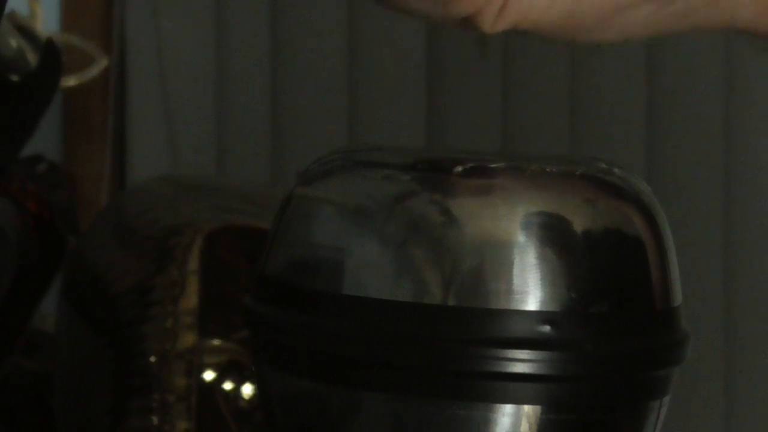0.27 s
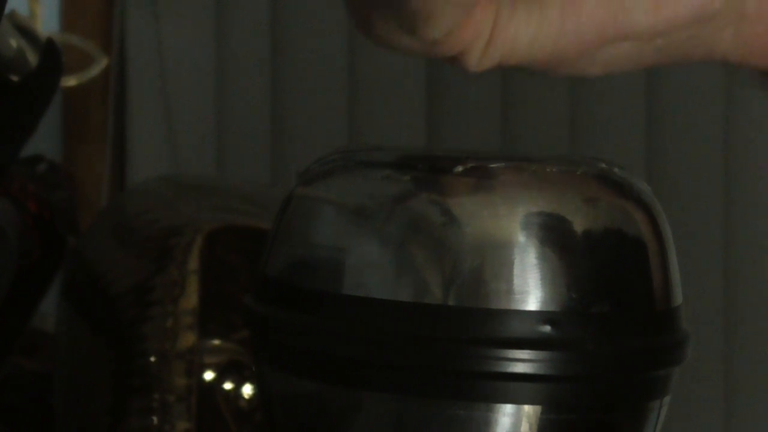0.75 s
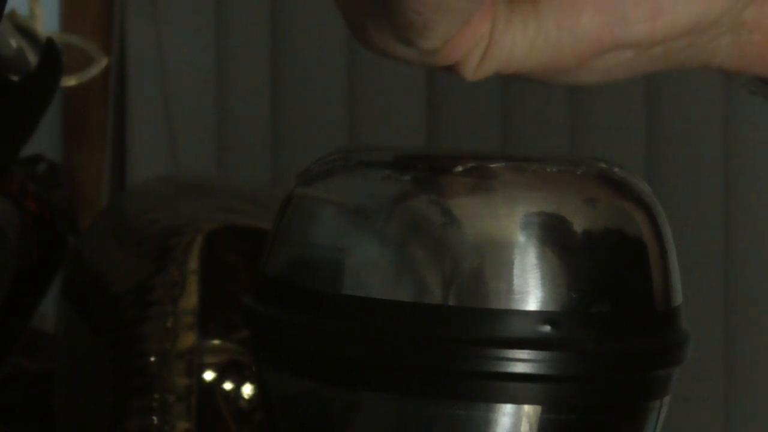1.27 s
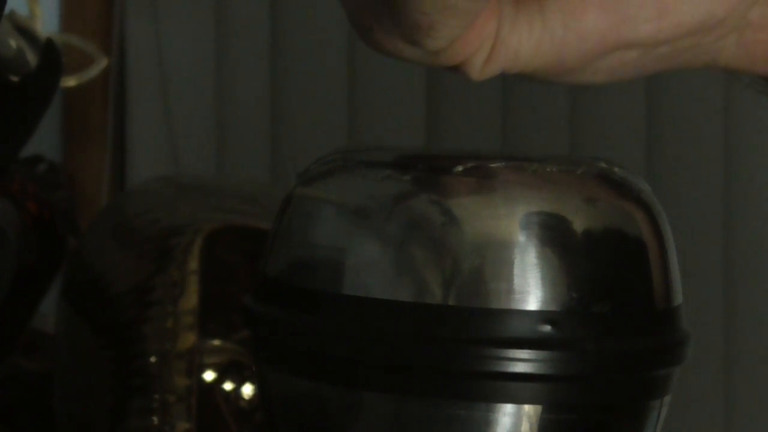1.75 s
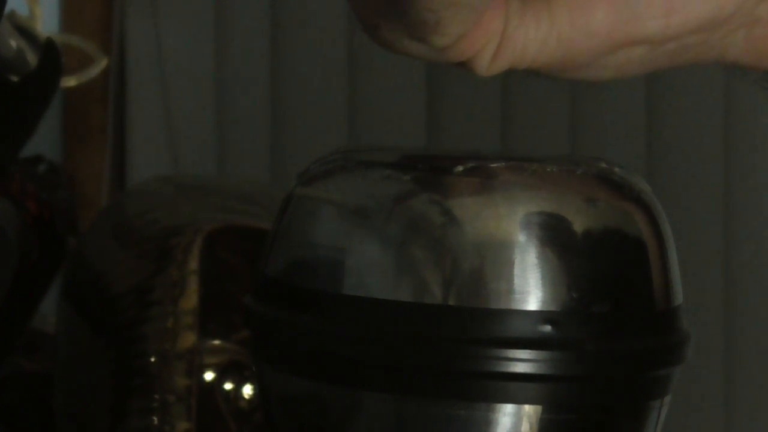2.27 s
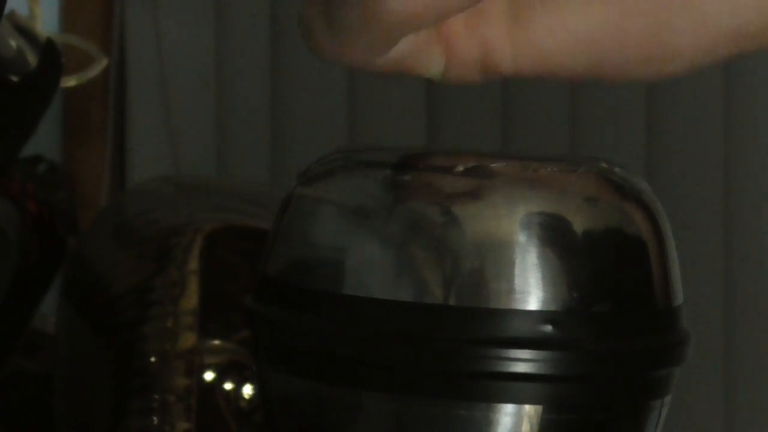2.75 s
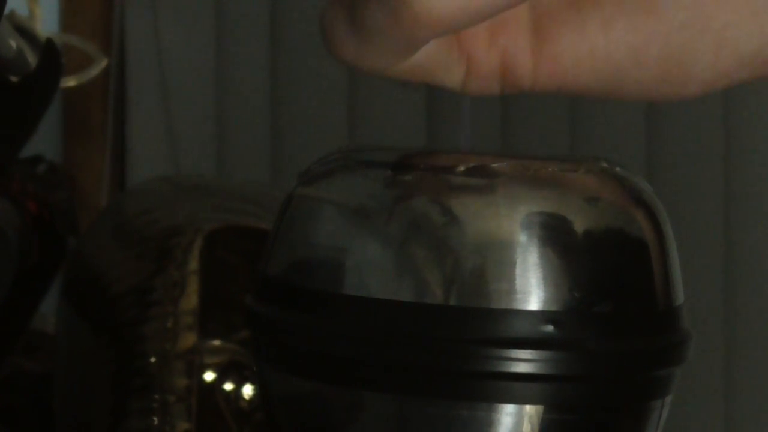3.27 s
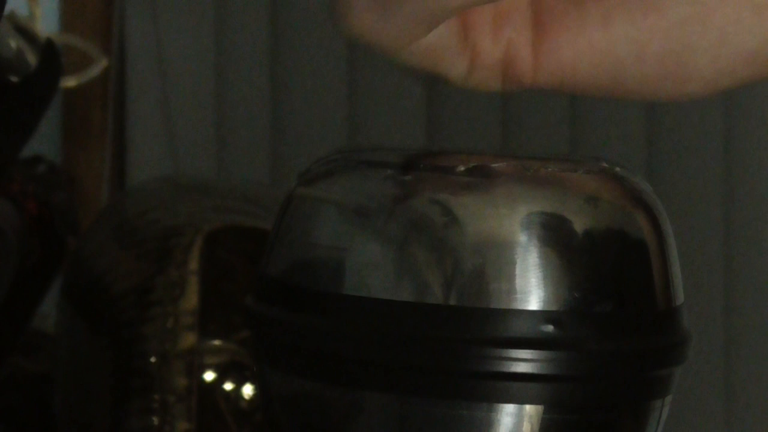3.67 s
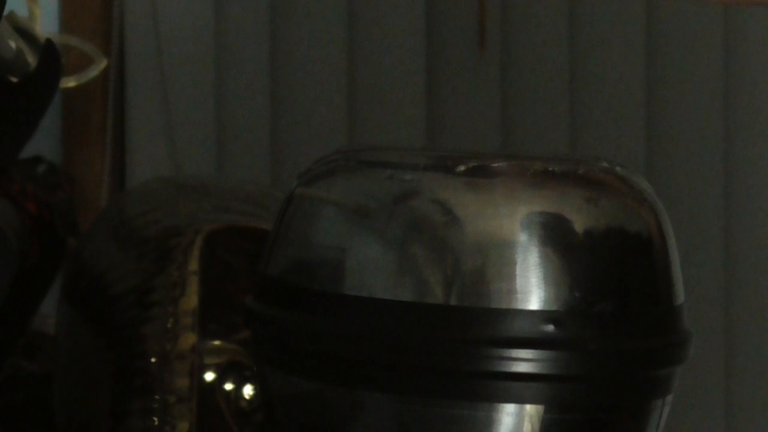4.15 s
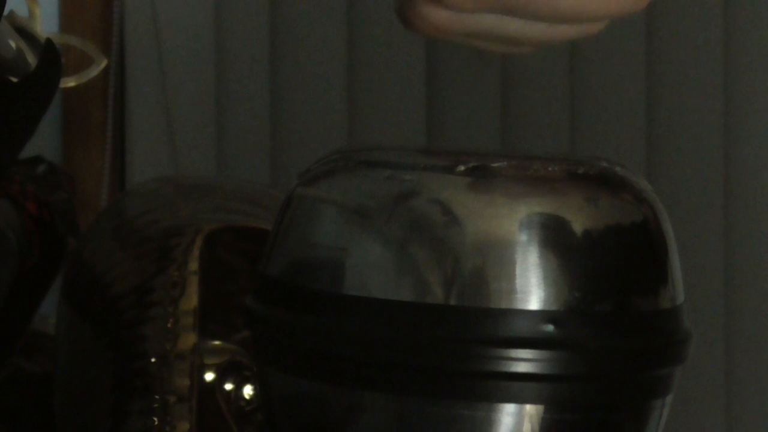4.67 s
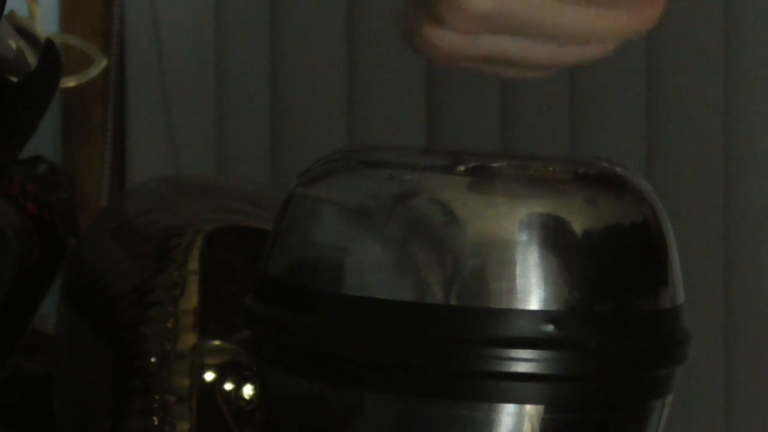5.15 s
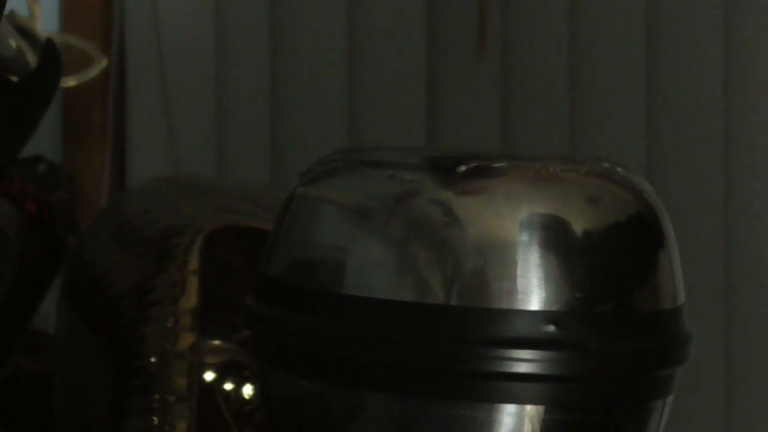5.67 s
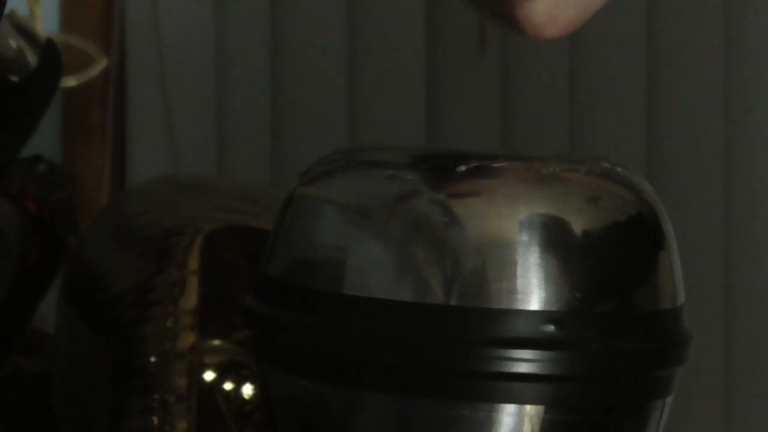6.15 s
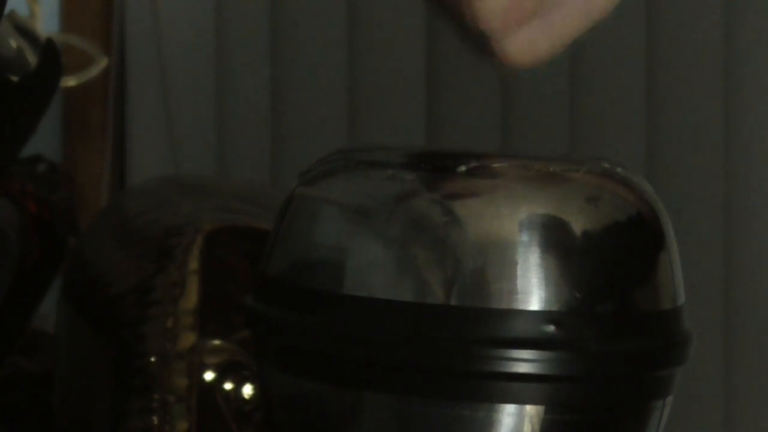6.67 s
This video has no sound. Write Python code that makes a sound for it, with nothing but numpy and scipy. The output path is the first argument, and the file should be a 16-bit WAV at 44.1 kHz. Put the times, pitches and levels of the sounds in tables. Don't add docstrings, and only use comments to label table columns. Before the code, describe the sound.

A small belt-driven static generator is already running and never stops. Its motor gives a harsh, raspy buzz with a thin metallic whine and high fizz, speeding and slowing about ten times a second. Underneath are a low, uneven boom near 180-200 hertz, belt rumble, light knocks, ticks and irregular slaps; the base shakes more strongly around 1.1 seconds and its boom almost vanishes near 3.1. Bright, dry sparks crack at about 0.7, 2.1 and 3.3 seconds. A faint snap comes at 4.4, then a fuller one at 5.1 and a close pair at 5.25 and 5.28, the second the loudest and sharpest. A last crack lands at 6.5, and buzzing continues to the end near 6.9. The microphone is close in a quiet room; strong cracks carry a brief thump and short room tail, and momentarily push the buzz down.

```python
import sys
import numpy as np
from scipy import signal
from scipy.fft import rfft, irfft, next_fast_len
from scipy.io import wavfile
from scipy.ndimage import uniform_filter1d

SR = 44100
rng = np.random.default_rng(int(sys.argv[2]) if len(sys.argv) > 2 else 0)


def master_out(mix):
    frames = np.transpose(np.atleast_2d(mix))
    ceiling = np.clip(frames, -1, 1)
    pcm = np.round(ceiling * 32767).astype(np.int16)
    wavfile.write(sys.argv[1], SR, pcm)


def voltage_ratio(level):
    return 10 ** (np.asarray(level, float) / 20)


N = 304731
TIME = np.arange(N) / SR
SIZE = next_fast_len(N + SR // 2)
HZ = np.maximum(np.arange(SIZE // 2 + 1) * SR / SIZE, 1)


def rms_one(x):
    return x / np.sqrt(np.mean(x ** 2) + 1e-20)


def wave(cycles):
    return np.cos(2 * np.pi * cycles)


def columns(rows, at, warp=np.asarray):
    first, *rest = np.transpose(rows)
    return [np.interp(warp(at), warp(first), column) for column in rest]


def level_curve(rows):
    return columns(rows, HZ, np.log)[0]


def peaks(modes):
    return sum(voltage_ratio(2 * db) / (1 + (2 * (HZ - hz) / width) ** 2) ** 2.0 for hz, width, db in modes)


def colour(x, gain):
    cepstrum = irfft(np.log(gain + 1e-9), SIZE)
    cepstrum[1:SIZE // 2] *= 2
    cepstrum[SIZE // 2 + 1:] = 0
    return irfft(rfft(x, SIZE) * np.exp(rfft(cepstrum)), SIZE)[..., :N]


def clicks(seconds, sizes):
    out = np.zeros(N + 2)
    at = np.clip(np.asarray(seconds) * SR, 0, N)
    np.add.at(out, at.astype(int), sizes * (1 - at % 1))
    np.add.at(out, at.astype(int) + 1, sizes * (at % 1))
    return out[:N]


def hump(middle_s, length_s):
    return np.cos(np.pi * np.clip((TIME - middle_s) / length_s, -.5, .5)) ** 2


def held(events, edge_s=0.01):
    level = np.zeros(N)
    for start, length, db in events:
        inside = np.minimum(TIME - start, start + length - TIME)
        level += voltage_ratio(db) * np.clip(inside / edge_s + .5, 0, 1)
    return level


def hush():
    return voltage_ratio(-72.5) * rms_one(colour(rng.standard_normal((2, N)), 1 / (1 + (HZ / 90) ** 2)))


# f/Hz, level/dB
ROOM_SHARE = [(100, -27), (200, -12), (380, -6), (700, -9.5), (1100, -12), (2400, -10.5), (4400, -7),
              (8000, -5.5), (15000, -5)]


def room(x, t60, level_db):
    t = np.arange(SR // 3) / SR
    tail = rng.standard_normal((2, len(t))) * voltage_ratio(-60 * t / t60) * np.clip(t / 0.0036, 0, 1)
    tail /= np.sqrt(np.sum(tail ** 2, axis=1, keepdims=True))
    wet = signal.fftconvolve(x[None], tail, axes=1)[:, :N]
    return colour(wet, voltage_ratio(level_curve(ROOM_SHARE) + level_db))


# t/s, lead over the even count/turns
ROLLER_LEAD = [(0, .215), (.25, .235), (.7, .31), (1.6, .31), (1.85, .29), (2.25, .32), (2.75, .29),
               (3.25, .355), (4.25, .355), (4.85, .325), (5.35, .36), (5.7, .34), (6.2, .37), (6.91, .315)]
ROLLER_PER_S = 10.4


def roller():
    return ROLLER_PER_S * TIME + columns(ROLLER_LEAD, TIME)[0]


# middle t/s, length t/s, boom change level/dB
BASE_SHIFTS = [
    (.56, 0.42, -10.5),
    (0.87, 0.15, 9.5),
    (1.137, 0.2, 13),
    (1.753, 0.42, 3),
    (3.095, 0.24, -15),
    (3.264, 0.18, 6),
    (3.874, 0.28, 6),
    (5.82, .2, -5),
    (6.003, 0.24, 0),
]
ROCK_HZ, ROCK_AT, ROCK_DB = 4.0, .12, 2.0


def base_swing():
    shifts_db = sum(db * hump(middle, length) for middle, length, db in BASE_SHIFTS)
    return ROCK_DB * wave(ROCK_HZ * TIME - ROCK_AT) + shifts_db


# f/Hz, width f/Hz, level/dB
BASE_MODES = [(185, 9.7, 4), (203.2, 11.4, 3), (102.8, 27, -14), (115.4, 6.5, -34.5), (160, 13, -25.5)]
# start t/s, length t/s, level/dB
BASE_SURGES = [
    (0.225, 0.093, -47.5),
    (1.085, 0.065, -50),
    (2.721, 0.11, -45.5),
    (3.268, 0.07, -46.5),
    (4.943, 0.088, -49),
    (5.494, 0.082, -48.5),
    (6.753, 0.082, -48.5),
]
BOOM_DB, SURGE_HZ = -54.5, 182.8


def base_boom(turn, swing_db):
    push = voltage_ratio(3.6 * wave(turn - .76) + 1.1 * wave(2 * (turn - .76)))
    boom = rms_one(colour(rng.standard_normal(N), np.sqrt(peaks(BASE_MODES))))
    boom /= np.sqrt(uniform_filter1d(boom ** 2, SR // 12) + .1)
    surge = held(BASE_SURGES)
    boom = voltage_ratio(BOOM_DB + swing_db) * push * boom / (1 + surge / voltage_ratio(BOOM_DB))
    return boom + surge * np.sqrt(2) * np.sin(2 * np.pi * SURGE_HZ * TIME)


# start t/s, length t/s, level/dB
BELT_HUMS = [
    (1.37, 0.16, -58.5),
    (1.65, 0.14, -59),
    (2.51, 0.11, -61),
    (3.19, 0.12, -59),
    (3.85, 0.14, -61),
    (4.25, 0.11, -59),
    (4.47, 0.29, -59),
    (5.98, 0.13, -59.5),
]
# middle t/s, length t/s, rumble change level/dB
BELT_DRAG = (2.88, 1, 1.6)
RUMBLE_DB, RUMBLE_FOLLOWS = -56.5, 0.23
SLAP_HZ, HUM_HZ = 35.22, 343


def belt_rumble(swing_db):
    beat = voltage_ratio(2.5 * wave(SLAP_HZ * TIME - .3))
    modes = [(280, 14.0, 1.5), (370, 132, -5), (517.6, 34, -2.5), (587.5, 71, -2.5)]
    rumble = rms_one(colour(beat * rng.standard_normal(N), np.sqrt(peaks(modes))))
    middle_s, length_s, drag_db = BELT_DRAG
    rumble *= voltage_ratio(RUMBLE_DB + RUMBLE_FOLLOWS * swing_db + drag_db * hump(middle_s, length_s))
    hum = held(BELT_HUMS) * beat * np.sqrt(2) * np.sin(2 * np.pi * HUM_HZ * TIME)
    return rumble + hum


def rattle(events, modes, length_ms, level_db):
    seconds, db = np.transpose(events)
    window = np.hanning(int(length_ms * SR / 1000))
    bursts = np.convolve(clicks(seconds, voltage_ratio(db + level_db)), window)[:N]
    return bursts * rms_one(colour(rng.standard_normal(N), np.sqrt(peaks(modes))))


def comb_touches(turn, offset):
    count = np.arange(1, int(turn[-1]))
    return np.c_[np.interp(count + offset, turn, TIME), 1.6 * rng.standard_normal(len(count))]


HARD_KNOCKS = [5, 10, 16, 17, 25, 45, 51, 59, 62]
KNOCK_DB, SEAM_DB, HARD_DB = -56, 2.5, 6
TURNS_PER_LOOP, SEAM_AT = 2.84, .9


def knocks(turn):
    count = np.arange(1, int(turn[-1]))
    seam_db = SEAM_DB * wave(count / TURNS_PER_LOOP - SEAM_AT)
    db = KNOCK_DB + seam_db + HARD_DB * np.isin(count, HARD_KNOCKS)
    return np.c_[np.interp(count + .1, turn, TIME), db + rng.standard_normal(len(count))]


# first t/s, slaps/count, peak level/dB
SLAP_RUNS = [(0.0775, 1, -57), (.234, 3, -53), (0.705, 1, -51), (1.171, 1, -54), (1.444, 2, -55),
             (1.755, 1, -55), (1.84, 1, -54), (2.4942, 1, -53), (3.1752, 6, -53.5), (3.8817, 2, -52),
             (4.426, 1, -53), (4.6512, 2, -53.5), (4.9232, 4, -57.5), (5.9868, 1, -52), (6.2546, 1, -54),
             (6.4421, 1, -56), (6.681, 1, -54)]
SLAP_GAP_S = .028


def slaps():
    events = []
    for first, count, db in SLAP_RUNS:
        for k in range(round(count)):
            events.append((first + k * SLAP_GAP_S, db + rng.normal(0, 1)))
    return events


SPARK_TIMES = [.73665, 2.07472, 3.34179, 4.37912, 5.13835, 5.24724, 5.27818, 6.49404]
# crack level/dB, pulse cut-off f/Hz, low body level/dB, wiring thump level/dB, ducking level/dB
SPARK_SHAPES = [
    (1.5, 11600, -38, -14, -11),
    (-0.5, 12500, -40, -12.5, -9),
    (-0.5, 11400, -26, -19, -6.5),
    (-19, 6700, -12, -48, 0.1),
    (-2, 10200, -4, -29, -5.5),
    (-1, 7400, -0.5, -48, -2),
    (3, 13300, -41, -22, -10),
    (1.5, 12000, -4.5, -23, -6.5),
]
# f/Hz, level/dB
CRACK_COLOUR = [(700, -69), (1500, -7.5), (2600, -2.5), (3700, 2.5), (5200, 7.5), (6800, 3.5), (8500, 11.5),
                (11000, 10), (13000, 15.5), (15500, 9), (17000, -15)]
# left t/ms, left level/dB, right t/ms, right level/dB
NEAR_BOUNCES = [(.18, -16.5, .09, -21), (0.379, -14, 0.179, -2.5), (.9, -12.5, 0.78, -10),
                (1.04, -14, 1.4, -8.5), (2.3, -16, 1.9, -30), (5.7, -22, 6.8, -25), (7.3, -9, 15, -28)]


def sparks():
    crack_db, cut_hz, body_db, thump_db, _ = np.transpose(SPARK_SHAPES)
    crack = np.zeros(N)
    for s, db, hz in zip(SPARK_TIMES, crack_db, cut_hz):
        at = int(s * SR)
        click = clicks([s], -voltage_ratio(db))[at:at + 200]
        crack[at:at + 200] += signal.lfilter(*signal.butter(2, min(hz, SR / 2.2), fs=SR), click)
    crack = colour(crack, voltage_ratio(level_curve(CRACK_COLOUR)))
    body = colour(clicks(SPARK_TIMES, -voltage_ratio(body_db + 7.5)), np.sqrt(peaks([(4320, 2760, 0)])))

    near = np.zeros((2, N))
    for left_ms, left_db, right_ms, right_db in NEAR_BOUNCES:
        near[0] += np.interp(TIME - left_ms / 1000, TIME, crack) * voltage_ratio(left_db)
        near[1] += np.interp(TIME - right_ms / 1000, TIME, crack) * voltage_ratio(right_db)

    thump = np.convolve(clicks(SPARK_TIMES, voltage_ratio(thump_db)), np.hanning(int(0.0011 * SR)))[12:N + 12]
    thump = signal.sosfilt(signal.butter(2, 90, "high", fs=SR, output="sos"), thump)
    dull = signal.sosfilt(signal.butter(4, 11500, fs=SR, output="sos"), crack + body)
    return crack + body + near + room(dull, t60=0.35, level_db=-3) + thump * [[.45], [-1]]


CROSSINGS_PER_TURN = 28.28


def brush_crossings(turn, swing):
    bind = 1 + .1 * rng.standard_normal(80)[(turn + .03).astype(int)]
    turns_per_s = uniform_filter1d(np.gradient(turn) * SR, SR // 4)
    pace = 1.062 + .058 * bind * (swing - 1.07)
    return np.cumsum(CROSSINGS_PER_TURN * turns_per_s * pace) / SR


# f/Hz, width f/Hz, depth level/dB
HOUSING_DIPS = [(470, 30, 4), (1054, 32, 5), (2114, 130, 10), (2350, 60, 6), (2920, 100, 14), (5150, 50, 8),
                (5280, 50, 7), (5620, 50, 8), (6050, 90, 7), (8530, 60, 10), (9150, 250, 2),
                (11150, 250, 2)]


def deafness():
    return 1 + peaks(HOUSING_DIPS)


# f/Hz, level/dB
HOUSING_COLOUR = [(24, -62), (40, -56), (134, -8), (191, -9.5), (461, -13), (782, -11.5), (865, -21),
                  (1200, -12.5), (2250, -36.5), (2690, -21.5), (6660, -9.5), (8150, -3.5), (9010, -9),
                  (14900, -26.5), (16500, -55)]
# f/Hz, width f/Hz, level/dB
HOUSING_RINGS = [(650, 46.5, -3), (780, 50, -5), (976, 28, -19), (3220, 115, -17.5), (3640, 21, -17),
                 (3740, 50, -9), (4010, 62, -10), (4740, 34, -9), (4820, 60, -13.5), (5700, 60, -12),
                 (5950, 90, -10), (6200, 95, -11), (6940, 70, -6), (7223, 102, -0.5), (7390, 110, 1),
                 (8050, 57, -2.5), (8300, 45, -12), (8176, 276, 1), (8450, 113, -1), (9570, 200, -7.5),
                 (10470, 320, -6.5), (15300, 1200, -28), (11720, 220, -11)]


def housing(x):
    power = voltage_ratio(2 * level_curve(HOUSING_COLOUR) - 0.5) + peaks(HOUSING_RINGS)
    return colour(x, np.sqrt(power) / np.sqrt(deafness()))


def flutter(crossing):
    return voltage_ratio(2 * np.interp(crossing / 5, np.arange(500), rng.standard_normal(500)))


# multiple, level/dB, gain when fast level/dB
WHINE_TONES = [(1, -72, 0), (4, -64, 3), (5, -66, -1), (6, -77, 1.5), (8, -76, 3), (11, -70, 0),
               (9, -68, 4.5), (10, -71, 4), (12, -65, 2), (13, -63, 2), (14, -62, 2.5), (15, -62, 2),
               (16, -61, 2), (17, -61, 2), (18, -63, 1), (19, -63, 1), (21, -62, 3), (24, -59, 4),
               (26, -61, 2)]


def motor_whine(crossing, swing):
    whine = np.zeros(N)
    for multiple, db, fast_db in WHINE_TONES:
        tone = np.sin(2 * np.pi * (multiple * crossing + rng.random()))
        whine += voltage_ratio(db + fast_db * swing) * flutter(crossing) * tone
    return voltage_ratio(3.3) * colour(whine, deafness() ** -.4)


GAP_DB = [-1, -0.5, -2]
# f/Hz, even pulses level/dB, brush bursts level/dB, plain friction level/dB
MOTOR_DRIVE = [(99, -12, -39, -1), (370, -26.5, -29, -3.5), (910, -4, -47, 6.5), (1150, -65, -71, -1),
               (2120, 16, 10, 6), (3220, -30.5, -8, -3.5), (4500, -11, 0.5, -0.5), (7970, 5.5, -6.5, -0.5),
               (9950, -3, -21, 6.5), (14600, -19, -26, 2)]
MOTOR_DB = -37


def motor(turn):
    swing = wave(turn - .97) + .22 * wave(2 * (turn - .1)) + .09 * wave(3 * turn)
    crossing = brush_crossings(turn, swing)
    luck = rng.standard_normal((2200, 3))

    count = np.arange(1, int(crossing[-1]))
    when = np.interp(count, crossing, TIME) + 2.2e-5 * luck[count, 0]
    pulses = clicks(when, voltage_ratio(np.array(GAP_DB)[count % 3] + 0.5 * luck[count, 1]))

    part = crossing % 1
    gate = np.exp(-part / .13) + .6 * np.exp(-((part - .28) % 1) / .17) + .06
    gate *= voltage_ratio(luck[crossing.astype(int), 2])
    bursts = rms_one(gate * rng.standard_normal(N))
    friction = rng.standard_normal(N)

    pulse_db, burst_db, friction_db = columns(MOTOR_DRIVE, HZ, np.log)
    drive = colour(rms_one(pulses - pulses.mean()), voltage_ratio(pulse_db))
    drive += colour(bursts, voltage_ratio(burst_db))
    drive += colour(friction, voltage_ratio(friction_db))
    load = voltage_ratio(0.68 * wave(turn - .98))
    return voltage_ratio(MOTOR_DB) * rms_one(housing(load * drive)) + motor_whine(crossing, swing)


def scene():
    turn = roller()
    swing_db = base_swing()
    machine = base_boom(turn, swing_db) + belt_rumble(swing_db)
    machine += rattle(comb_touches(turn, -.08), [(13100, 1000, 0)], length_ms=16, level_db=-56)
    machine += rattle(comb_touches(turn, -.22), [(10420, 350, 0)], length_ms=65, level_db=-49)
    machine += rattle(knocks(turn), [(3190, 220, 0)], length_ms=16, level_db=0)
    machine += rattle(slaps(), [(398, 460, 4), (1360, 1100, 5.9)], length_ms=9.1, level_db=4.5)
    machine += motor(turn)
    machine = signal.sosfilt(signal.cheby2(16, 50, 16050, fs=SR, output="sos"), machine)
    across = room(machine, t60=0.042, level_db=2.0)[0] * [[1], [-1]]
    return machine * voltage_ratio([[.1], [-.1]]) + across + sparks() + hush()


def low_pass(x):
    return signal.sosfilt(signal.butter(12, 16860, fs=SR, output="sos"), x)


def record(dry):
    t = np.arange(SR // 2) / SR
    dip = (1 - np.exp(-t / 0.019)) * np.exp(-(t / 0.083) ** 1.05) * 1.19
    duck_db = np.array(SPARK_SHAPES)[:, 4]
    gain = voltage_ratio(signal.fftconvolve(clicks(SPARK_TIMES, duck_db), dip)[:N])
    x = signal.sosfilt(signal.butter(1, 60, "high", fs=SR, output="sos"), dry * gain)
    x = signal.sosfilt(signal.cheby2(10, 50, 17000, fs=SR, output="sos"), .7 * np.tanh(x / .7))
    return low_pass(x)


dry = scene()
out = record(dry)
master_out(out)
```